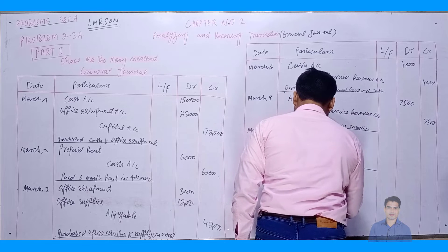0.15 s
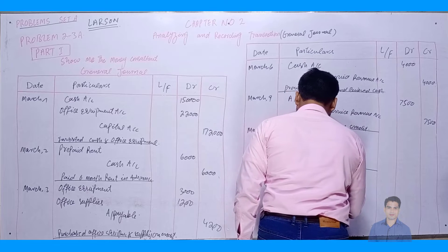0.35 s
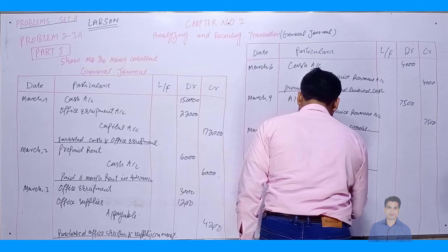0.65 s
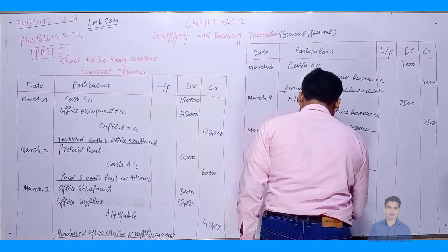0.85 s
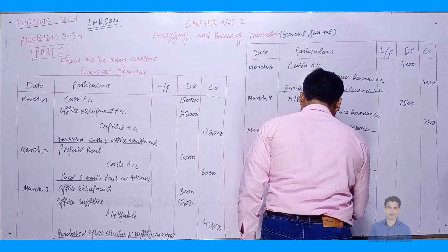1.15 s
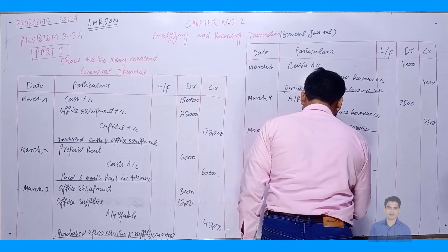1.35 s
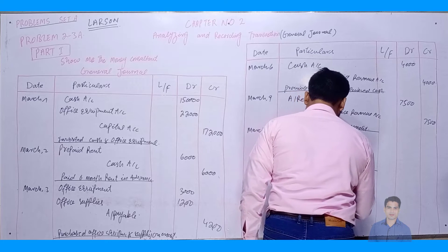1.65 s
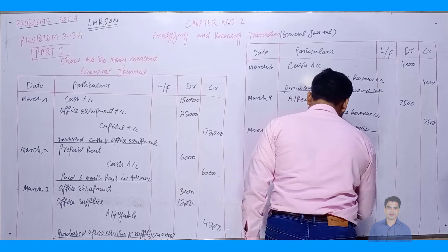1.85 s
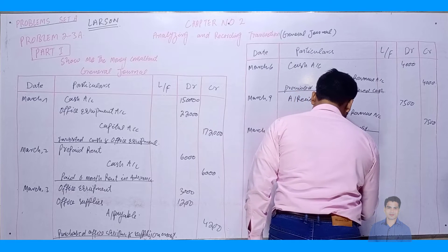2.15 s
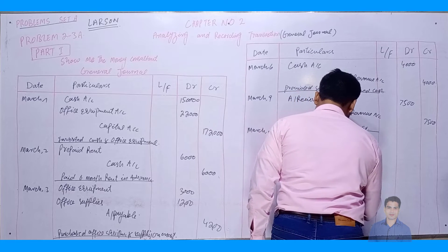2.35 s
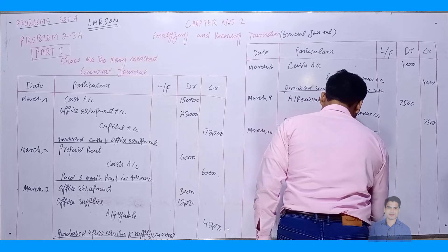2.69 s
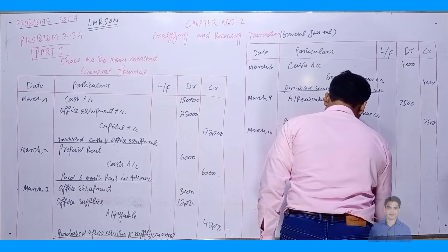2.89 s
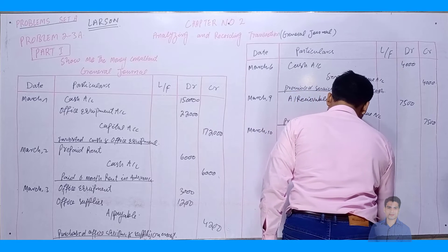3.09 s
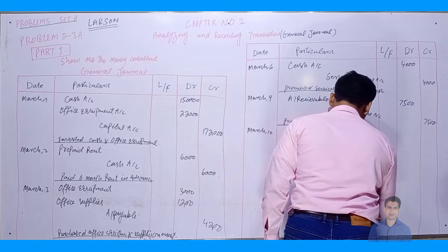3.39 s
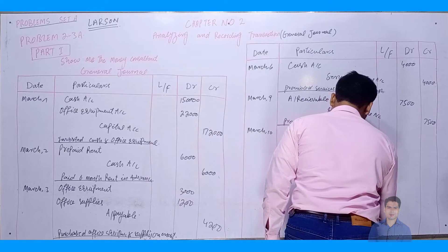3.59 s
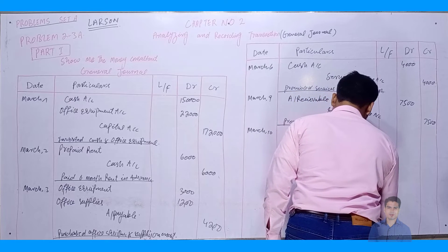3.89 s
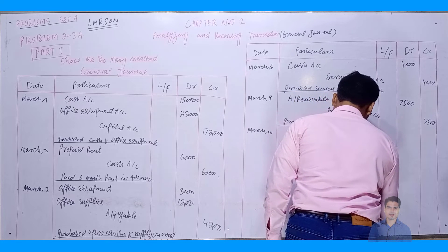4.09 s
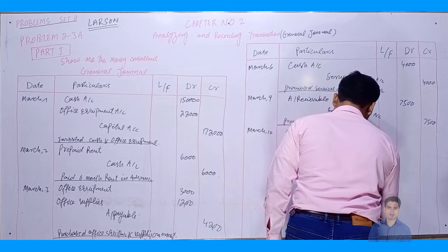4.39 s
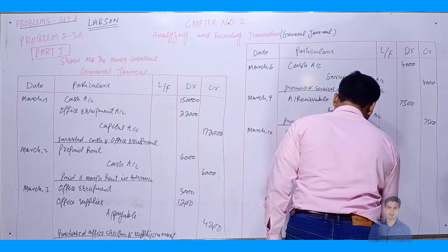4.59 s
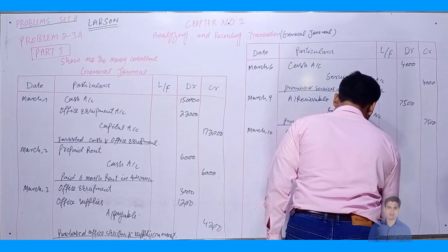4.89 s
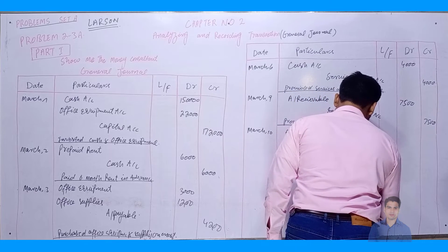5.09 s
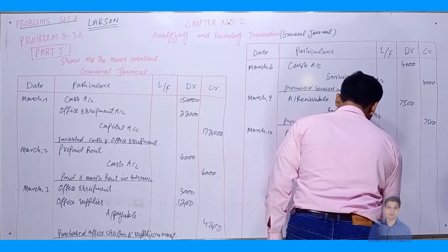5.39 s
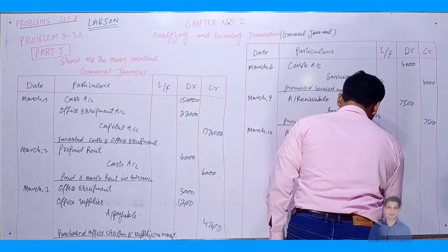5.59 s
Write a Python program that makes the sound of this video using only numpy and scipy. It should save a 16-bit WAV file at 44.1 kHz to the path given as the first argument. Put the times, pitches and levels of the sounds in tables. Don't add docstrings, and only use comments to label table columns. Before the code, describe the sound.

A man writes with a felt marker on a hollow whiteboard in a quiet room, picked up in mono with little echo. From 0 to 1.2 s about a dozen short, dry, bright rubbing strokes of 50 to 100 milliseconds follow quickly, over a low panel rumble strongest at the very start, with small snags and a pen click near 1.1 s. The arm lifts, cloth brushes softly and the board creaks faintly until 1.6 s. Dull hollow thuds land around 1.67, 1.93 and 2.1 s among sparse strokes up to 2.3 s. After a short gap, dense scratching runs from 2.65 to 4.25 s, with a softer knock at 3.2 s. Firm taps at 4.35, 4.5 and 4.7 s lead into a last brisk run until 5.5 s. A strong low tap at 5.6 s and a faint cuff drag finish. Weak air noise and thin hiss remain throughout.

```python
import sys
import numpy as np
from scipy import signal
from scipy.fft import rfft, irfft, next_fast_len
from scipy.io import wavfile
from scipy.ndimage import uniform_filter1d

SR = 44100
rng = np.random.default_rng(int(sys.argv[2]) if len(sys.argv) > 2 else 0)


def decibels_to_gain(level_db):
    exponent = np.asarray(level_db, float) / 20
    return 10 ** exponent


def wav_record(signal):
    frames = np.transpose(np.atleast_2d(signal))
    bounded = np.clip(frames, -1, 1)
    quanta = np.round(bounded * 32767).astype(np.int16)
    wavfile.write(sys.argv[1], SR, quanta)


N = 253303
SECONDS = np.arange(N) / SR
SILENT_DB = -120

# pitch_hz, level_db (per Hz)
RUB_SPECTRUM = [(1760, -53), (3000, -9), (3270, -32), (3710, -26), (3900, -11), (4230, -2.5), (4560, 1),
                (5150, -1), (5680, -3.5), (6280, -2), (6680, -2), (7040, -8.5), (7840, -33), (8000, -45),
                (10400, -56.5), (17600, -120)]
RUB_STEP_HZ = 4100


def noise():
    return rng.standard_normal(N)


def rms_one(x):
    return x / np.sqrt(np.mean(x ** 2) + 1e-20)


def follow(curve):
    return np.interp(SECONDS, *np.transpose(curve))


def colour(x, spectrum, top_hz=15650, step_hz=0):
    hz, db = np.transpose(spectrum)
    size = next_fast_len(N)
    grid = np.maximum(np.arange(size // 2 + 1) * SR / size, 1)
    level_db = np.interp(np.log(grid), np.log(hz), db, left=SILENT_DB, right=SILENT_DB)
    gain = decibels_to_gain(level_db) * (grid < top_hz)
    gain[grid < step_hz] *= decibels_to_gain(-13)
    return rms_one(irfft(rfft(x, size) * gain, size)[:N])


def resonate(x, peaks):
    out = 0
    for k, (hz, width, db) in enumerate(peaks):
        r = np.exp(-np.pi * width / SR)
        poles = [1, -2 * r * np.cos(2 * np.pi * hz / SR), r * r]
        out = out + (-1) ** k * decibels_to_gain(db) * signal.lfilter([1 - r * r, 0, r * r - 1], poles, x)
    return rms_one(out)


def resonate_twice(x, peaks):
    return resonate(resonate(x, peaks), peaks)


def drift(rate_hz):
    every = 64 // 2
    r = np.exp(-2 * every * np.pi * rate_hz / SR)
    draws = rng.standard_normal(N // every + 2002)
    slow = signal.lfilter([1], [1, -2 * r, r * r], draws)[2000:]
    return np.interp(np.arange(N) / every, np.arange(len(slow)), rms_one(slow))


def decay(t, hz, t60):
    return np.sin(2 * np.pi * hz * t) * decibels_to_gain(-60 * t / t60)


def patchy(x, patchy_db, size):
    cells = signal.stft(x, nperseg=1024)[2]
    field = uniform_filter1d(rng.standard_normal(cells.shape), size=2, axis=0)
    field = uniform_filter1d(field, size=size, axis=1)
    return rms_one(signal.istft(cells * decibels_to_gain(patchy_db * rms_one(field)), nperseg=1024)[1][:N])


def events_db(start_s, length_s, first_db, last_db, rise, fall):
    out = np.full(N, float(SILENT_DB))
    for s, length, first, last in zip(start_s, length_s, first_db, last_db):
        near = slice(max(int(s * SR) - SR // 2, 0), int(s * SR) + SR)
        u, length = SECONDS[near] - s, max(length, 1 / SR)
        db = first + (last - first) * np.clip(u / length, 0, 1)
        db += rise * np.minimum(u, 0) - fall * np.maximum(u - length, 0)
        out[near] = np.maximum(out[near], db)
    return out


def reach():
    return np.clip((SECONDS - 2.3) / 0.5, 0, 1)


def slips(per_s, spread_db, stutter_db):
    born = rng.random(N) < per_s / SR
    sizes = decibels_to_gain(spread_db * np.minimum(rng.exponential(1, N), 5)) * rng.choice([-1, 1], N)
    return born * sizes * decibels_to_gain(stutter_db * drift(200))


def sliding_sheen(grains, rub_db):
    # pitch_hz, level_db (per Hz)
    near_lines = [(4590, -43), (7400, -22), (8000, -19), (8650, -5), (9150, -1.5), (9850, -7), (10500, -2),
                  (11000, -4), (11350, -11), (11900, -6), (12900, -18), (14000, -11), (14500, -6),
                  (15300, 2), (15600, -3)]
    far_lines = [(4590, -60), (8000, -24), (8400, -14), (8850, -2), (9200, 0), (9700, -3), (10100, -13),
                 (10850, -7), (11300, -12), (12200, -26), (13300, -34), (13900, -21), (14350, -10),
                 (15150, -5), (15600, -9)]
    # start_s, pitch_hz
    swing = [(0.0, 8960), (0.08, 9200), (0.59, 9100), (0.83, 9150), (0.94, 8840), (1.58, 9000),
             (1.62, 9300), (2.13, 9200), (2.19, 9120), (2.86, 9170), (2.92, 8850), (3.21, 9300),
             (3.25, 9200), (4.34, 9150), (4.44, 9600), (4.5, 8800), (4.56, 9250), (5.55, 9180)]
    # start_s, level_db
    top_tilt = [(0, 2.5), (.2, 1.5), (.45, 0), (.75, -2), (1.1, -2), (1.75, 0), (2.2, -2), (2.68, -2),
                (2.77, 0.5), (2.86, 4), (2.96, -0.5), (3.05, 1), (3.26, -7.5), (3.36, -1), (3.48, -1.5),
                (3.59, -1), (3.69, -1.5), (3.8, -5), (3.9, -2), (4.0, -4), (4.1, 0.5), (4.2, -2),
                (4.41, -2), (4.75, -2), (4.82, -2.5), (4.92, 2), (5.02, -6), (5.13, -2.5), (5.24, -4),
                (5.34, 0), (5.45, -4)]
    rest_hz = 9180
    hz, s, cells = signal.stft(grains, SR, nperseg=512)
    at = np.minimum((s * SR).astype(int), N - 1)
    slide = np.interp(s, *np.transpose(swing)) / rest_hz - 1
    slides_here = np.clip((13000 - hz) / 2500, 0, 1)
    seen = np.log(np.maximum(hz, 1))[:, None] - np.outer(slides_here, slide)

    def level_db(lines):
        pitch_hz, db = np.transpose(lines)
        return np.interp(seen, np.log(pitch_hz), db, left=SILENT_DB, right=SILENT_DB)

    near, far = level_db(near_lines), level_db(far_lines)
    db = near + reach()[at] * (far + 2.5 - near)
    broad = uniform_filter1d(rng.standard_normal(cells.shape), size=9, axis=0)
    db += 1.5 * rms_one(uniform_filter1d(broad, size=9, axis=1))
    top = hz > 13200
    db += np.outer(top, np.interp(s, *np.transpose(top_tilt)))
    firm = np.clip(rub_db[at] + 55.5, -14, 6)
    db += np.outer(np.where(top, 0.17, 0.14), firm)
    return signal.istft(cells * decibels_to_gain(db), nperseg=512)[1][:N]


def strokes():
    # start_s, length_s, bite_db, lift_db, grip_db (passed to the barrel, relative)
    first_word = [(0.0, 0.049, -55, -59.5, -8.5), (0.072, 0.065, -57.5, -65.5, -8.5),
                  (0.157, 0.071, -76.5, -53.5, -11), (0.236, 0.06, -53.5, -62.5, -6.5),
                  (0.309, 0.05, -57.5, -62.5, -10), (0.385, 0.067, -76, -51.5, -13.5),
                  (0.519, 0.053, -61, -63.5, -13.5), (0.589, 0.06, -63.5, -53, -11),
                  (0.698, 0.095, -56.5, -58, -14.5), (0.857, 0.052, -66, -59.5, -10.5),
                  (0.957, 0.074, -60.5, -62.5, -14), (1.051, 0.05, -67.5, -54.5, -12.5),
                  (1.151, 0.031, -58, -58, -16)]
    second_word = [(1.674, 0.037, -59.5, -61.5, -14.5), (1.765, 0.048, -59, -58, -16),
                   (1.971, 0.029, -69, -62, -18), (2.148, 0.049, -61.5, -62, -8.5),
                   (2.2, 0.072, -58.5, -71.5, -21), (2.264, 0.054, -61, -54, -12.5)]
    third_word = [(2.652, 0.017, -63.5, -62, -9), (2.666, 0.034, -56.5, -60, -9.5),
                  (2.719, 0.046, -64.5, -60, -17.5), (2.752, 0.091, -64, -70.5, -20),
                  (2.825, 0.029, -66.5, -54.5, -21), (2.853, 0.052, -60, -66.5, -8.5),
                  (2.92, 0.075, -61, -73.5, -13), (3.024, 0.054, -57, -61.5, -15),
                  (3.207, 0.11, -76.5, -63.5, -11), (3.335, 0.085, -61.5, -72.5, -17),
                  (3.434, 0.052, -71.5, -57.5, -15), (3.492, 0.042, -57, -61, -9),
                  (3.55, 0.062, -64, -66, -16), (3.63, 0.041, -73.5, -61, -14.5),
                  (3.667, 0.039, -59.5, -53.5, -13), (3.767, 0.11, -57.5, -71, -14.5),
                  (3.858, 0.031, -66.5, -53, -15.5), (3.888, 0.021, -61.5, -51, -8.5),
                  (3.98, 0.044, -54, -67, -20.5), (4.042, 0.057, -69.5, -56.5, -14.5),
                  (4.1, 0.03, -59.5, -58.5, -8.5), (4.175, 0.067, -56, -71, -11.5)]
    fourth_word = [(4.352, 0.0038, -61, -64, -5.5), (4.396, 0.025, -58.5, -60.5, -17.5),
                   (4.515, 0.0104, -56.5, -60, -12.5), (4.556, 0.013, -68.5, -64.5, -19),
                   (4.727, 0.047, -53.5, -62, -9.5), (4.79, 0.043, -63.5, -65.5, -15),
                   (4.868, 0.048, -75.5, -53, -16), (4.905, 0.033, -60, -54, -9),
                   (4.974, 0.034, -66.5, -58, -17), (5.011, 0.034, -64, -64.5, -15),
                   (5.095, 0.042, -62.5, -52, -12.5), (5.128, 0.052, -53.5, -63, -6.5),
                   (5.2, 0.079, -64.5, -64, -12.5), (5.296, 0.057, -63, -55.5, -8),
                   (5.411, 0.069, -58.5, -60, -15.5), (5.458, 0.064, -64, -69, -8),
                   (5.622, 0.039, -71, -80, -28), (5.679, 0.092, -81, -73.5, 2)]
    # start_s, level_db (against the rub)
    tilt = [(0.0, -13.5), (.1, -6.5), (.25, -8.5), (.34, -9.5), (.45, -4), (.55, -6), (.63, -6.5),
            (.75, -10), (.89, -4), (1.0, -5.5), (1.09, -5), (1.2, -1), (1.8, -6.5), (1.99, -15),
            (2.199, -4.5), (2.3, -6.5), (2.7, -12.5), (2.78, -6), (2.86, -5), (2.96, -11), (3.05, -3),
            (3.25, -1.5), (3.36, -5.5), (3.47, -5), (3.55, -10), (3.69, -4.5), (3.8, -5), (3.9, -4.5),
            (4.0, -6), (4.1, -5.5), (4.25, -5), (4.5, -11), (4.75, -11), (4.82, -9), (4.92, -6), (5.02, -8),
            (5.13, -4.5), (5.24, -9), (5.34, -6), (5.45, -6.5), (5.6, -10)]
    # pitch_hz, width_hz, level_db, change_db (as the grip slides up)
    barrel = [(1165, 190, 0.5, -10), (1264, 120, -8.5, 0.5), (1824, 320, -8, -4.5), (2042, 300, -5.5, -4.5),
              (2230, 230, -7, 4), (2515, 161, -4, -1), (2638, 340, -2.5, 0.5), (3745, 1200, 0, -0.5),
              (1618, 1050, -5.5, -5.5), (1060, 230, -16.5, 6)]
    words = first_word + second_word + third_word + fourth_word
    s, length, bite_db, lift_db, grip_db = np.transpose(words)
    bite = 2205.5
    rub_db = events_db(s, length, bite_db, lift_db, bite, 702)
    pen_db = events_db(s, length, bite_db + grip_db, lift_db + grip_db + 0.5, bite, 240)
    echo_db = events_db(s, length, bite_db - 18, lift_db - 18, bite, 298)
    sheen_db = events_db(s, length, bite_db, lift_db, bite, 899.5) + follow(tilt)

    grains = slips(per_s=15000, spread_db=1.5, stutter_db=1.0)
    rub = patchy(colour(grains, RUB_SPECTRUM, step_hz=RUB_STEP_HZ), patchy_db=3.6, size=5)
    sheen = patchy(sliding_sheen(grains, rub_db), patchy_db=4.5, size=5) * decibels_to_gain(sheen_db - 0.5)
    later = np.clip((SECONDS - 3.1) / 2.5, 0, 1)
    pen = 0
    for hz, width, db, change_db in barrel:
        pen = pen + resonate_twice(grains, [(hz, width, db)]) * decibels_to_gain(db + change_db * later)
    pen = patchy(pen, patchy_db=6.0, size=5)
    return (decibels_to_gain(rub_db) + decibels_to_gain(echo_db)) * rub + sheen + decibels_to_gain(pen_db) * pen


def shaking():
    # start_s, panel_db, hollow_db, wall_db
    nudges = [(0.0, -40, -54, -62.5), (.262, -83, -71.5, -69.5), (0.475, -62.5, -73.5, -68.5),
              (0.654, -94, -68, -70), (.74, -74, -73.5, -72.5), (0.899, -58, -71, -66.5),
              (1.126, -63, -69.5, -71.5), (1.22, -76, -99, -67.5), (1.29, -88, -103, -79),
              (1.379, -76, -92, -67), (1.71, -56.5, -69.5, -73), (1.77, -62.5, -78.5, -73),
              (1.811, -62, -74.5, -82), (1.901, -85, -85, -79), (2.24, -63.5, -91, -79),
              (2.312, -59, -66, -72.5), (2.39, -77, -100, -86.5), (2.681, -84, -72, -75.5),
              (2.76, -75, -86, -81), (2.853, -65.5, -73, -100), (3.068, -73, -79, -75.5),
              (3.28, -72, -91, -95), (3.47, -64, -79, -82), (3.728, -67, -62.5, -100),
              (3.87, -77, -95, -68.5), (3.922, -76.5, -68, -90), (4.106, -63.5, -66.5, -99),
              (4.226, -70, -74.5, -100), (4.46, -103, -85, -61), (4.62, -97, -97, -71),
              (4.74, -89, -65.5, -72), (4.81, -81, -82, -75), (4.931, -79.5, -71.5, -94),
              (4.969, -88, -71.5, -93), (5.141, -78, -62.5, -75.5), (5.17, -90, -72, -90),
              (5.311, -88, -69, -80), (5.36, -100, -64, -74), (5.4, -93, -69.5, -94)]
    # rise_db_per_s, fall_db_per_s
    nudge_shapes = [(290, 201.5), (433, 328), (151, 107)]
    # pitch_hz, width_hz, level_db
    panel_ring = [(189, 102, -9), (261.2, 26, -0.5), (339.5, 41, -8.5)]
    wall_ring = [(69.5, 53, -5), (127.7, 21, 1.5)]
    first_bay = [(588, 190, 4), (715, 205, 5)]
    last_bay = [(605, 92, 2), (812, 104, 0.5)]
    low_bay = [(376, 210, 0)]
    s, *bodies = np.transpose(nudges)
    panel_db, hollow_db, wall_db = [events_db(s, 0 * s, db, db, rise, fall)
                                    for db, (rise, fall) in zip(bodies, nudge_shapes)]
    panel = resonate_twice(noise(), panel_ring) * decibels_to_gain(panel_db)
    moved = np.clip((SECONDS - 4.5) / 0.3, 0, 1)
    hollow = (1 - moved) * resonate_twice(noise(), first_bay)
    hollow += moved * resonate_twice(noise(), last_bay)
    hollow *= decibels_to_gain(hollow_db)
    hollow += (1 - reach()) * resonate_twice(noise(), low_bay) * decibels_to_gain(hollow_db + 1.0)
    wall = resonate_twice(noise(), wall_ring) * decibels_to_gain(wall_db)
    return panel + hollow + wall


def room():
    # pitch_hz, level_db (per Hz)
    air_spectrum = [(25, -14), (60, 3), (120, 0.5), (300, -2.5), (500, -9.5), (1000, -13), (2000, -17),
                    (2700, -18.5), (3200, -30), (3600, -44)]
    hiss_spectrum = [(1880, -43), (3200, -17), (3560, -9.5), (3940, -8.5), (6400, -7), (7660, -18.5),
                     (9440, -10), (12300, -21.5), (16000, -43.5), (22000, -120)]
    # start_s, level_db
    stir = [(0, 1), (1.2, -3), (1.6, -0.5), (2.45, -4), (2.8, -2.2), (3.6, -3), (4.3, -4), (4.8, -3),
            (5.1, -5), (5.45, -3), (5.74, 5.5)]
    air = decibels_to_gain(-75.5 + follow(stir)) * patchy(colour(noise(), air_spectrum), patchy_db=4.0, size=6)
    hiss = decibels_to_gain(-85) * colour(noise(), hiss_spectrum, top_hz=12400)
    whine_spectrum = [(14500, -18), (14750, 1.0), (15050, 4), (15250, -10.0)]
    whine = decibels_to_gain(-94.5) * colour(noise(), whine_spectrum)
    return air + hiss + whine


def snags():
    # start_s, level_db (peak)
    jerks = [(0.4444, -51), (0.539, -37.5), (0.6415, -38), (0.706, -36), (1.0949, -49), (1.1684, -36),
             (2.143, -63), (2.2707, -58), (2.6624, -41), (3.975, -45), (4.099, -42.5), (4.3915, -49),
             (4.902, -55)]
    half = SR // 200
    width_s = 0.0023
    shape, t = np.zeros(N), np.arange(-half, half) / SR
    for s, db in jerks:
        at = max(round(s * SR), half) - half
        shape[at:at + len(t)] += decibels_to_gain(db - 16.5) * np.exp(-.5 * ((t - width_s) / width_s) ** 2)
    return shape * colour(noise(), RUB_SPECTRUM, step_hz=RUB_STEP_HZ)


def taps():
    # start_s, level_db, contact_ms, knock_db (relative), tick_db (relative)
    landings = [(0.71, -53, 4, -23, -2), (0.467, -56.5, 3.4, -65, -58), (0.874, -46, 3, -60, -60),
                (2.854, -52.5, 6.2, -63, -60), (3.056, -61, 3.5, -61, -58), (3.069, -56, 2.3, -63, -58),
                (3.32, -57.5, 5.9, -63, -60), (3.446, -52.5, 5.8, -67, -56), (3.724, -51.5, 6.3, -63, -60),
                (4.201, -51, 3.3, -60, -60), (0.985, -51.5, 5.9, -27, -5), (1.6661, -28, 4.65, -64, -26),
                (1.93, -18.5, 2.9, -36, -26.5), (2.0995, -20.6, 2.82, -32.5, -43),
                (2.573, -57, 4.1, -73, -60), (2.58, -57.5, 5.1, -43, -31), (2.63, -43, 6.3, -58, -60),
                (2.641, -48.5, 6.7, -60, -21), (3.1933, -33.5, 5.75, -62, -46),
                (3.239, -63, 6.5, -74.5, -60), (4.3455, -22, 3.14, -42, -21),
                (4.5096, -25.9, 4.04, -54, -46), (4.6812, -19.5, 3.17, -47, -63),
                (5.601, -17, 2.83, -34, -38.5)]
    # pitch_hz, level_db, t60_s, sense (first swing out +1, in -1)
    board_modes = [(59.1, -26.9, .12, -1), (80.1, -24.8, .092, -1), (150.5, -33.5, .3, -1),
                   (186.8, -38, .46, -1), (223.5, -19.6, .18, -1), (246.5, -4.4, .044, 1),
                   (250.4, -18.1, .214, 1), (260.8, -17.9, .187, 1), (280, -16.1, .081, -1),
                   (324.7, -24, .224, 1), (340.3, -26.5, .114, 1), (351.8, -6.3, .019, -1),
                   (520.8, -16.8, .016, -1), (681.6, -26, .05, 1)]
    # pitch_hz, level_db, t60_s
    knock_modes = [(444, -3.5, 0.076), (616, -2, 0.04), (713, 6, 0.07), (870, -1.5, 0.016)]
    nib_modes = [(2740, -15.5, .008), (4780, 5.5, 0.019), (5280, -4.5, 0.0096), (6300, -7, 0.0097),
                 (9100, -7, 0.0081), (10500, -17, 0.0047)]
    # pitch_hz, width_hz, level_db
    after_ring = [(128, 40, 0), (204, 60, 1), (262, 77, -1.5), (327, 48, 1), (448, 130, -6.5)]
    out, t = np.zeros(N + SR), np.arange(SR // 2) / SR
    ring = resonate_twice(noise(), after_ring)
    bright = resonate_twice(noise(), [(3380, 350, -13.5), (4730, 600, 4.0), (6400, 460, 3.5)])
    woody = resonate(noise(), [(553, 95, 3.0), (765, 760, -1.0)])
    felt = signal.butter(4, 670, fs=SR, output="sos")
    board = sum(sense * decibels_to_gain(db) * decay(t, hz, t60) for hz, db, t60, sense in board_modes)
    late, snap = np.maximum(t - 0.001, 0), np.maximum(t - 0.0022, 0)
    onset = np.clip(late / 0.0013, 0, 1)
    struck_knock = sum(decibels_to_gain(db) * decay(late, hz, t60) for hz, db, t60 in knock_modes)
    struck_nib = sum(decibels_to_gain(db) * decay(snap, hz, t60) for hz, db, t60 in nib_modes)
    struck_nib = np.clip(snap / 0.0004, 0, 1) * struck_nib
    ring_fade = decibels_to_gain(-26.5 - 60 * t / 0.25) * np.clip(t / 0.017, 0, 1) ** 2

    for s, db, contact_ms, knock_db, tick_db in landings:
        at = round(s * SR)
        contact = contact_ms * SR / 1000
        u = np.arange(int(contact)) / contact
        push = np.sin(2 * np.pi * u) * np.sin(np.pi * u)
        thud = signal.fftconvolve(board, push)[:len(t)] * 4 / len(u)
        thud[:len(u)] += decibels_to_gain(-25.2) * push
        knock = onset ** 2 * decibels_to_gain(knock_db + 6.0) * struck_knock
        knock += onset ** 2 * decibels_to_gain(knock_db + 3.0 - 60 * t / 0.27) * np.resize(woody[at:], len(t))
        tick = onset * decibels_to_gain(tick_db - 11.0 - 60 * t / 0.022) * np.resize(bright[at:], len(t))
        tick += decibels_to_gain(tick_db - 9.0) * struck_nib
        tail = ring_fade * np.resize(ring[at:], len(t))
        out[at:at + len(t)] += decibels_to_gain(db) * (signal.sosfilt(felt, thud + knock) + tick + tail)
    return out[:N]


def pen_click():
    # start_s, level_db (peak), pitch_hz, t60_s
    clicks = [
        (1.119, -37, 946, 0.019),
        (2.141, -48.5, 1056, 0.044),
        (4.353, -57.5, 3500, 0.054),
        (4.379, -63, 3360, 0.05),
        (4.882, -67, 1100, 0.032),
    ]
    out, t = np.zeros(N), np.arange(SR // 10) / SR
    for s, db, hz, t60 in clicks:
        at = round(s * SR)
        out[at:at + len(t)] += decibels_to_gain(db) * np.clip(t / 0.0018, 0, 1) ** 2 * decay(t, hz, t60)
    return out


def cloth_and_creak():
    # start_s, length_s, first_db, last_db
    sleeve = [
        (1.18, 0.44, -80.5, -83.5),
    ]
    cuff = [
        (5.65, 0.1, -79.5, -73),
    ]
    brush = resonate(noise(), [(1080, 230, -3.5), (2294, 88, -1)]) * decibels_to_gain(3.0 * drift(10))
    brush *= decibels_to_gain(events_db(*np.transpose(sleeve), 300, 280))
    drag = resonate(noise(), [(1540, 270, 6.0), (2264, 290, -2.0)])
    drag *= decibels_to_gain(events_db(*np.transpose(cuff), 300, 300))
    creak = resonate_twice(noise(), [(314.5, 53, 0)])
    creak *= decibels_to_gain(events_db([1.2], [.2], [-68], [-76], 220, 200))
    return brush + drag + creak


def scene():
    writing = strokes() + shaking() + room() + snags()
    return (writing + taps() + pen_click() + cloth_and_creak())[None]


def top_cut(x):
    return signal.sosfilt(signal.butter(12, 16170, fs=SR, output="sos"), x)


def record(dry):
    bass_cut = signal.butter(2, 38, "high", fs=SR, output="sos")
    return top_cut(signal.sosfilt(bass_cut, dry))


dry = scene()
out = record(dry)
wav_record(out)
```